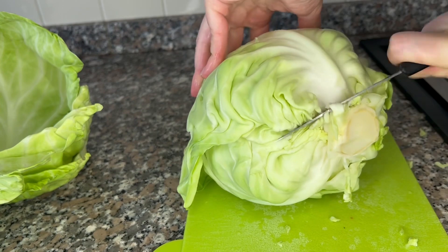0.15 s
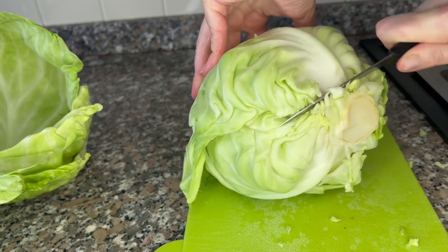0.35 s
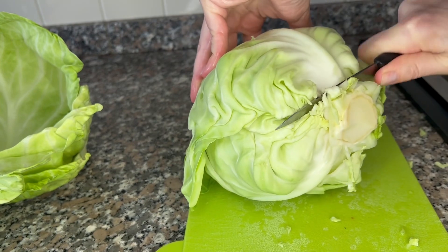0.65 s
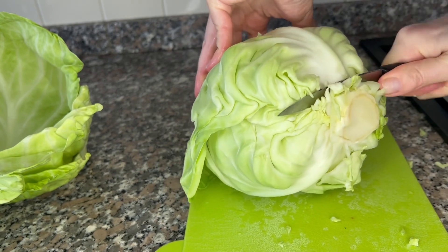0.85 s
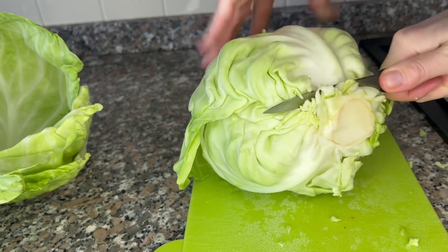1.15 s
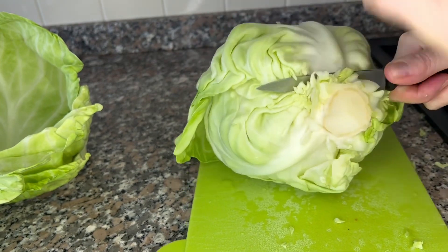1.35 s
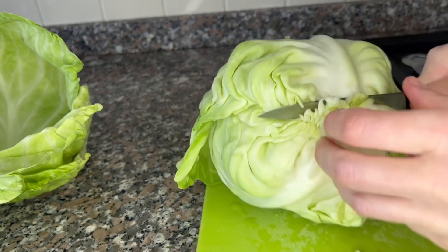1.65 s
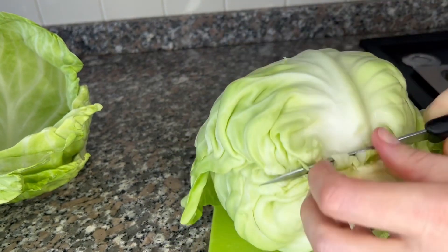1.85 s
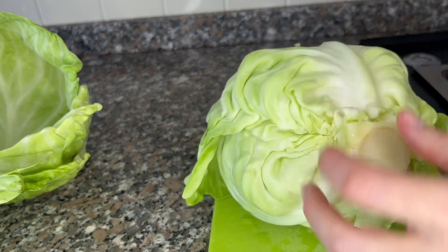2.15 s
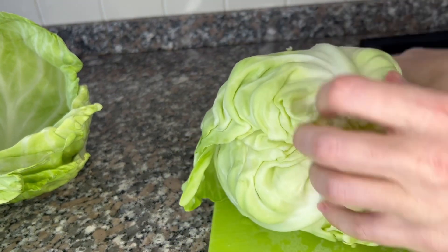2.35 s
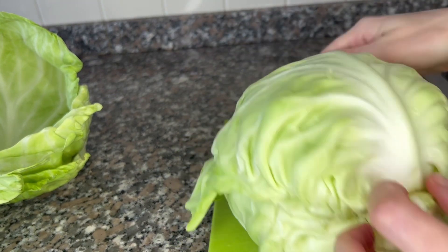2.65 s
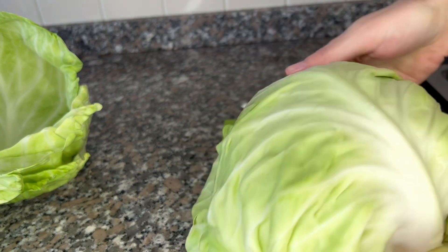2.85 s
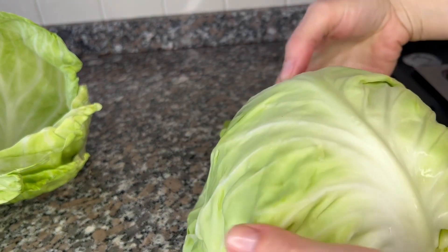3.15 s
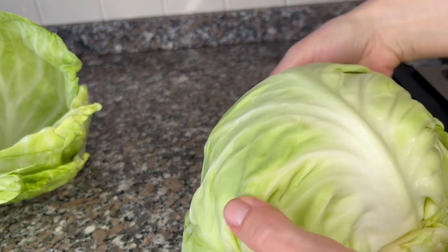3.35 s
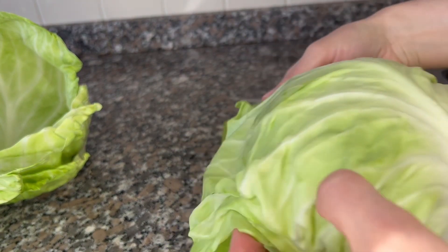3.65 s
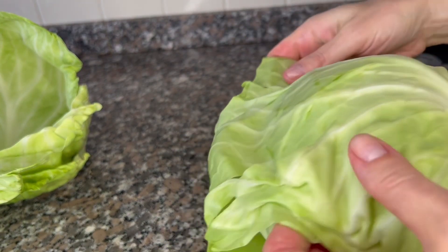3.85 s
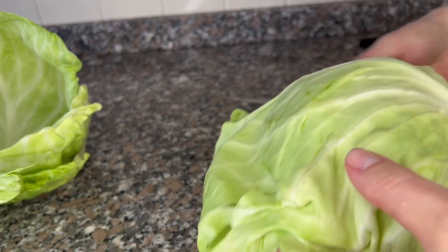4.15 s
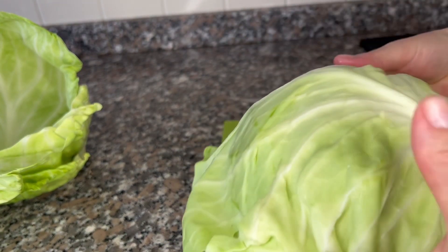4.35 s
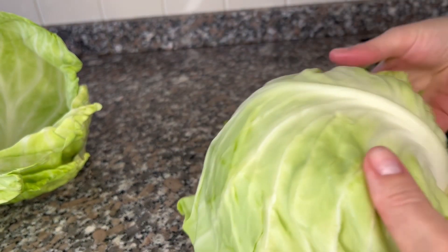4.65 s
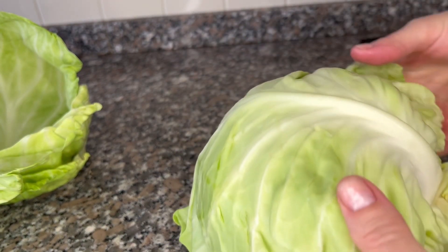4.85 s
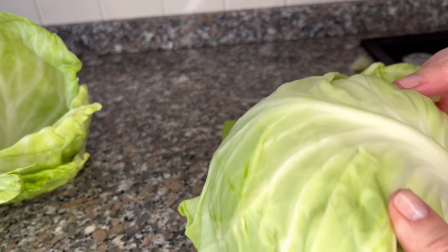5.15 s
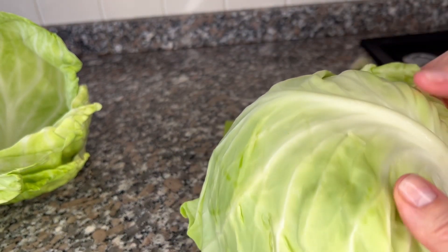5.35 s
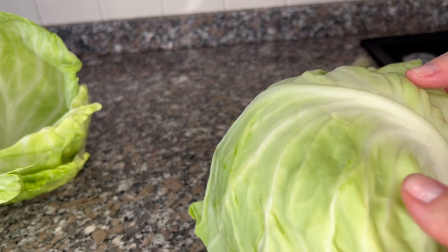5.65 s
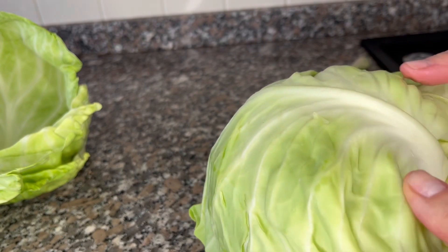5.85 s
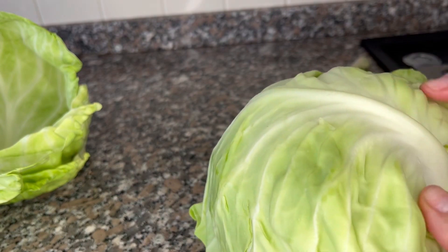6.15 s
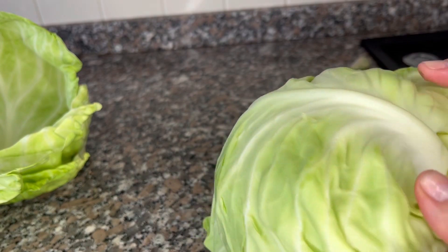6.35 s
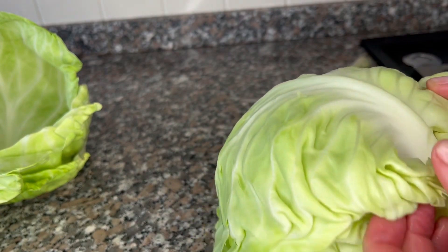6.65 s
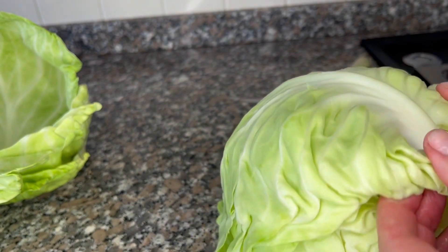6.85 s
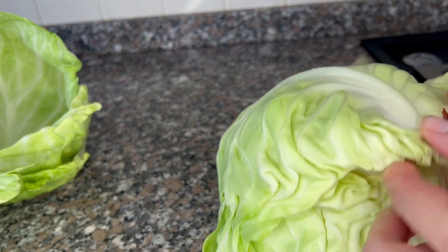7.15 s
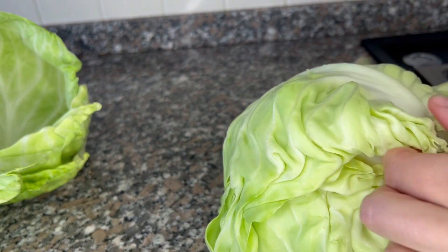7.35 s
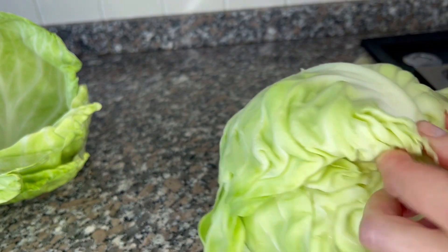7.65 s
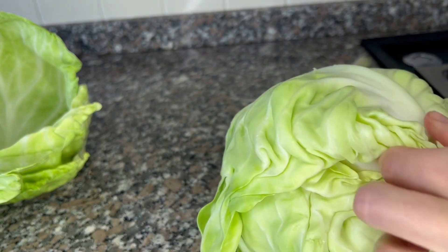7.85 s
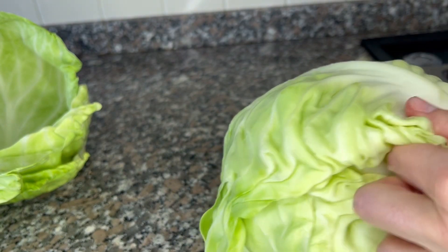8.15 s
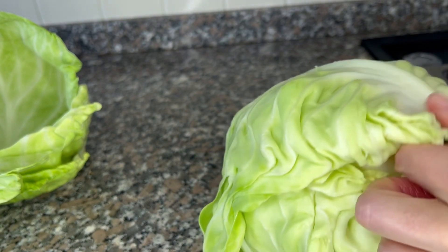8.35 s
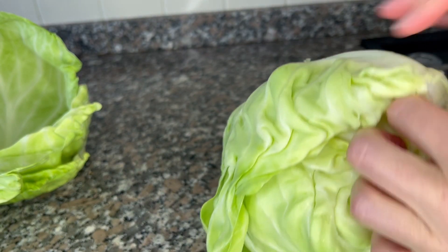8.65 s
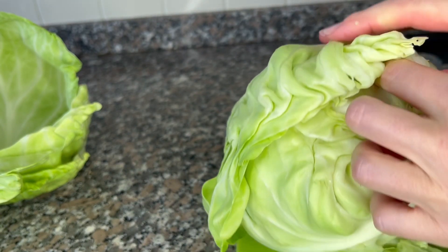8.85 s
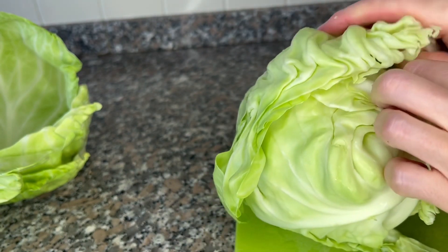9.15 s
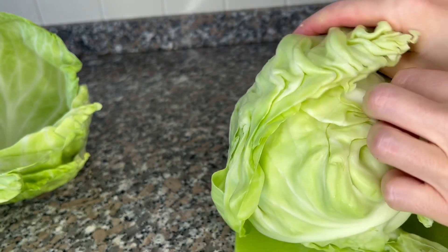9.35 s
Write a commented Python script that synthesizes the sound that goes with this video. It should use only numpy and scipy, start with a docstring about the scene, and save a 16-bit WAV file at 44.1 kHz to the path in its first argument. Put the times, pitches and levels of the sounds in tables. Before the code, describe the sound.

Crisp cutting at a cabbage stalk, sharp woody cracks, then close leafy rustles, rips and vein snaps, ending in a strong tearing burst.

```python
"""A raw cabbage is cut at the stalk and peeled by hand on a plastic board in a small kitchen.
Throughout, filtered noise gives still air, low rumble and a faint appliance hum.
First the knife crunches in (bursting cells modulate band noise) and draws out with a soft rub. Then the stalk
cracks off in short ringing bursts. Last, fingers slide over leaves that rip (burst cells), squeak (stick-slip
pulses through a resonance) and snap off (noise bursts), while the head bumps softly (damped, sagging notes)."""
import sys
import numpy as np
from scipy import signal
from scipy.fft import rfft, irfft, next_fast_len
from scipy.io import wavfile
from scipy.ndimage import uniform_filter1d

SR = 44100
rng = np.random.default_rng(int(sys.argv[2]) if len(sys.argv) > 2 else 0)


def int16_out(signal):
    """Quantize to a 16-bit WAV file."""
    q = np.round(np.clip(np.atleast_2d(signal).T, -1, 1) * 32767)
    wavfile.write(sys.argv[1], SR, q.astype(np.int16))


N = 419391

# Levels, body and crispness are relative: each source adds its own trim.
# Appliance hum: (time [s], level [dB])
HUM_LEVEL = [(0, -87), (1.1, -71.5), (2, -85), (2.4, -65.5), (3.4, -63), (3.9, -80.5), (9.5, -75.5)]
# Low rumble: (time [s], level [dB])
RUMBLE_LEVEL = [(0, -75), (2, -85), (4.2, -80), (5.3, -67.5), (6.4, -73), (7.1, -59), (7.8, -76),
                (9.5, -67)]
# Spectrum of still air: (frequency [Hz], relative density [dB per Hz])
AIR_SPECTRUM = [(25, -17), (48, 9), (140, 5), (250, 5.5), (600, 5), (8000, 2.5), (16000, -48)]
# Reverberation of the kitchen: (frequency [Hz], time to fall by 60 dB [s])
KITCHEN_T60 = [(100, 0.36), (500, 0.48), (2000, 0.73), (6000, 0.56), (15000, 0.06)]
# Left-right likeness, limited to 0..1 in use: (frequency [Hz], likeness [ratio])
LIKENESS = [(80, 0.94), (600, 0.77), (4000, 0.7), (6500, 0), (9000, 1.1)]
# Left minus right: (frequency [Hz], level [dB])
BALANCE = [(1400, 1), (2300, -1.5), (4500, 6), (6200, 3.5), (8000, 0)]
# Phase lag of the right microphone port: (frequency [Hz], lag [half turns])
PORT_LAG = [(0, 0), (1700, -.12), (2800, .22), (7400, .17), (8500, 0), (9800, -1), (10600, -1), (11600, -2),
            (12500, -2), (13400, -3), (14200, -3), (15200, -4)]
# The head bumps on the board: (time [s], level [dB], nominal pitch [Hz])
BUMPS = [(2.532, -33, 308), (2.56, -33, 204), (3.13, -35, 294), (3.195, -36, 340), (6.307, -42.5, 154),
         (6.903, -35.5, 440), (7.083, -38.5, 360), (7.623, -35, 400), (7.673, -32, 410), (8.044, -25, 225),
         (8.056, -40, 80.4), (8.062, -26, 282), (8.086, -27.5, 308), (8.168, -39, 245), (9.201, -31.5, 404)]
# Waxy leaves stick and slip: (time [s], length [s], typical slip rate [1/s], resonance [Hz], level [dB])
SQUEAKS = [(4.173, 0.08, 72, 850, -51.5), (4.462, 0.048, 510, 3230, -45), (5.606, 0.046, 390, 1480, -46),
           (6.723, 0.016, 770, 805, -51.5), (6.718, 0.019, 800, 2630, -46.5),
           (7.092, 0.063, 300, 1570, -48.5)]
# Small hollow clicks of blade, stalk and leaf: (time [s], level [dB], ring [Hz])
CLICKS = [(1.494, -40, 4500), (2.519, -25, 1190), (2.625, -36, 2750), (2.66, -30, 2390), (3.543, -37, 690),
          (3.675, -34, 1890), (4.06, -36, 1880), (4.088, -36, 1860), (4.28, -34, 855), (4.33, -34.5, 2530),
          (5.316, -30, 1310), (5.587, -35.5, 1120), (5.81, -33, 1390), (5.943, -33, 1710),
          (6.36, -38, 1780), (6.428, -39.5, 2170), (6.801, -32, 2500), (7.39, -34, 1430),
          (7.587, -40, 1210), (8.741, -38, 1550), (9.077, -37, 1710)]
# Steady hold of the hands on the head: (time [s], level [dB], body [dB], crispness [dB])
GRIP = [(0, -67, 13.5, 15), (.42, -76, 7, -9), (.56, -52.5, -1, 13.5), (1.28, -58, -24, -0.5),
        (1.47, -76.5, -24, -6.5), (2.33, -65.5, -6, -5), (2.58, -47.5, 18.5, -2.5), (3.02, -68.5, -39, -9),
        (3.3, -57, 5, -2), (4.08, -54.5, -26, 1), (4.3, -51, -13.5, -9), (4.75, -52.5, -4.5, 0),
        (5.9, -53.5, -4, -3.5), (6.07, -64.5, -4.5, -3), (7.1, -51, -5.5, 2), (7.98, -61, -12.5, -1),
        (9.1, -54.5, 0, -1), (9.51, -37.5, -3, -1.5)]
# Soft rubs: the knife draws out, later fingers slide over leaves: (time [s], length [s], level [dB])
SOFT_RUBS = [(1.114, 0.31, -61.5), (1.69, 0.26, -59), (2.198, 0.19, -58.5), (2.694, 0.26, -54),
             (4.143, 0.41, -56), (4.649, 0.12, -49.5), (4.819, 0.036, -45.5), (4.866, 0.065, -48),
             (5.035, 0.065, -45), (5.095, .055, -52.5), (5.641, 0.11, -45.5), (5.798, 0.094, -44.5),
             (5.885, 0.16, -52.5), (6.112, 0.35, -54.5), (7.668, 0.24, -50.5), (8.865, 0.11, -49)]
# A leaf rips away from the head: (time [s], length [s], level [dB], body [dB], crispness [dB])
RIPS = [(2.91, 0.028, -46, -14.5, -10), (3.09, 0.13, -42, -11, -36), (3.16, 0.066, -38.5, 2, 12.5),
        (3.298, 0.046, -43.5, 0, -6), (3.462, 0.05, -47.5, -6.5, -6.5), (3.617, 0.094, -45.5, -5.5, -4.5),
        (3.945, 0.04, -50.5, -31, -2), (4.352, 0.052, -43, -12, -1), (4.45, 0.06, -44.5, -2, 8.5),
        (4.597, 0.034, -48, -5.5, -2), (5.347, 0.066, -44.5, -12, -5.5), (5.419, 0.036, -41, -7, -11),
        (5.705, 0.072, -43.5, -6, 14), (6.52, 0.025, -43, -10, 0), (6.657, 0.022, -46, -0.5, 5),
        (6.87, 0.027, -46, 3, 6), (7.007, 0.034, -45, 1, -7.5), (7.148, 0.015, -45, 2, -29),
        (7.276, 0.0224, -49.5, -6, -7), (7.606, 0.035, -44.5, -12, -7.5), (8.034, 0.032, -32, -17, -1.5),
        (8.08, 0.099, -48, -10, -5), (8.318, 0.12, -55, 3, -0.5), (8.953, 0.034, -45, -6, -5),
        (8.98, 0.12, -62, 29, -10), (9.172, 0.045, -40.5, -2.5, -11.5), (9.269, 0.1, -41, -11.5, -8),
        (9.426, 0.15, -31.5, -4, -12), (9.47, 0.14, -26.5, 4, -3.5)]
# The blade crunches through: (time [s], length [s], level [dB])
CUTS = [(0.134, 0.053, -55), (0.34, 0.019, -53.5), (0.475, 0.043, -50), (0.591, 0.12, -40.5),
        (0.732, 0.044, -49), (0.821, 0.018, -41.5), (1.078, 0.054, -43), (1.172, 0.1, -63),
        (1.886, 0.05, -53)]
# Leaf veins snap: (time [s], level [dB], ring [Hz], crispness [dB])
SNAPS = [(0.1, -41, 950, -13.5), (0.495, -35, 1320, -3), (0.63, -32.5, 3430, -24), (0.664, -27.5, 3250, -5),
         (0.825, -24.5, 2700, -7), (0.837, -28.5, 2820, -30), (0.889, -27.5, 2580, -14),
         (0.905, -23, 3330, -16), (0.946, -28, 4400, 6), (1.797, -33, 6950, 12), (2.242, -38.5, 2560, -17),
         (3.168, -20.5, 1380, -13.5), (3.706, -33, 1930, -31), (3.999, -34.5, 4950, 8),
         (4.032, -26, 1700, -6), (4.252, -27.5, 900, -36), (4.414, -30.5, 1820, -9.5),
         (4.609, -30.5, 843, -25), (5.045, -33, 1000, -2), (5.281, -27, 1550, -13),
         (5.287, -22.5, 2430, -19), (5.297, -26, 2150, -17), (5.344, -26.5, 2640, -16),
         (5.367, -27, 2770, -16), (5.432, -27, 750, -29), (5.673, -33, 1590, -2), (5.836, -31.5, 1920, -12),
         (5.865, -28, 2450, 5), (6.303, -27, 2960, -14), (6.491, -28, 1660, -15), (6.53, -24.5, 1870, -6.5),
         (6.554, -29, 1540, -13), (6.64, -31.5, 1430, -12), (6.792, -31.5, 2480, -4),
         (6.84, -28, 2030, -23), (6.846, -25.5, 1910, -14.5), (6.899, -29.5, 1700, -6),
         (7.082, -27.5, 725, -20), (7.173, -30, 1780, -12), (7.183, -29, 1110, -15),
         (7.295, -31.5, 1700, -14), (7.521, -26.5, 1680, -9), (7.797, -22.5, 1870, -13.5),
         (8.04, -15.5, 1520, -16), (8.321, -36, 1270, -16), (8.931, -21.5, 1410, -17.5),
         (9.147, -29, 2450, -23), (9.263, -33, 2190, -17), (9.457, -15, 1620, -22),
         (9.471, -14.5, 1220, -25), (9.498, -12.5, 870, -23)]
# The stalk breaks: (time [s], level [dB], ring [Hz], crispness [dB])
CRACKS = [(2.397, -3.5, 1080, -4), (2.524, -4, 960, -27), (2.554, -20.5, 1040, -37),
          (2.584, -19.5, 1130, -45), (2.613, -24, 890, -25), (2.667, -23.5, 2380, -11),
          (2.681, -28, 2430, -13), (2.787, -18.5, 2380, -16), (2.927, -22.5, 2190, -17.5),
          (3.072, -16, 1080, -15.5), (3.091, -21, 1160, -42), (3.1, -18, 1090, -78), (3.134, -8, 1180, -39),
          (3.152, -19, 1500, -6)]
# Spectra of leaf, vein and stalk: (frequency [Hz], relative density [dB per Hz])
LEAF_SPECTRUM = [(70, -9.5), (450, -3.5), (750, -1.5), (2200, -4), (4000, -9), (6500, -12), (11500, -12),
                 (13000, 1.5), (16000, -39.5)]
VEIN_SPECTRUM = [(80, -71), (300, -5), (1000, -1.5), (4000, -3), (11000, -1), (15000, -8.5)]
STALK_SPECTRUM = [(80, -8.5), (300, 5), (1000, 2.5), (1900, 8), (3200, 2), (8000, -12), (11000, -53),
                  (15000, -36)]

HUM_HZ, AIR_DB, CUTOFF_HZ = 135.8, -70, 16000
CLICKS_PER_S, PEEL_FROM_S = 15, 3.3   # stray clicks
CELL_S = .0008   # base decay time of a burst cell
SHIVER_DB, SHIVER_S = -17, .008   # a snapped piece shivers a little longer
CLUMP_DB = 4.0   # spread of the slow swells in cell size
RUB = .14   # power of the smooth rub against the cells
EDGES = np.geomspace(70, 17000, 19)   # band edges [Hz]
CENTRES = np.sqrt(EDGES[1:] * EDGES[:-1])
TIME = np.arange(N) / SR
STEP = 64   # samples per step of the slow controls
SLOW_TIME = TIME[::STEP]


def from_db(db):
    """Logarithmic level: decibels to amplitude gain."""
    return 10 ** (np.asarray(db) / 20)


def rms_one(x):
    """Normalisation of effective value: scale to rms 1."""
    return x / np.sqrt(np.mean(x ** 2) + 1e-20)


def in_time(rows):
    """Linear interpolation: each column of a curve at every sample."""
    s, *columns = np.transpose(rows)
    return [np.interp(TIME, s, column) for column in columns]


def at_hz(points, hz):
    """Logarithmic pitch: interpolate a table on a log-frequency axis."""
    f, value = np.transpose(points)
    return np.interp(np.log(hz), np.log(f), value)


def band(x, low, high):
    """Causal band-pass filtering between two frequencies."""
    sos = signal.butter(2, [low, high], "band", fs=SR, output="sos")
    return signal.sosfilt(sos, x + 1e-18)


def drift(rate):
    """Slow random fluctuation: straight lines between unit-normal knots, rate of them per second."""
    knots = rng.standard_normal(int(N / SR * 400) + 2)
    return np.interp(TIME * rate, np.arange(len(knots)), knots)


def add(track, s, sound):
    """Superposition: mix a sound into a track at time s."""
    i = int(np.clip(round(s * SR), 0, N - 1))
    track[..., i:i + sound.shape[-1]] += sound[..., :N - i]


def spread(mid, side, hz):
    """Coherence: left and right from two unrelated sounds, as alike as the ports hear this pitch."""
    alike = np.clip(at_hz(LIKENESS, hz), 0, 1)
    common = np.sqrt((1 + alike) / 2) * mid
    opposed = np.sqrt((1 - alike) / 2) * side
    return np.stack([common + opposed, common - opposed])


def band_gains(spectrum):
    """Spectral density times bandwidth: each band's rms share."""
    gains = from_db(at_hz(spectrum, CENTRES)) * np.sqrt(np.diff(EDGES))
    return gains / np.linalg.norm(gains)


def blend(hz, body, crisp):
    """Spectral tilt: dB at one pitch, from body (low) and crispness (high) against the middle range."""
    corners = np.log([330, 1400, 6000])   # body, middle, crisp [Hz]
    body_weight = np.interp(np.log(hz), corners, [1, 0, 0])
    crisp_weight = np.interp(np.log(hz), corners, [0, 0, 1])
    return body_weight * body + crisp_weight * crisp


def leaf_colour(body_db, crisp_db):
    """Spectral shaping at constant power: band shares of a leaf with this body and crispness."""
    tilt = from_db([blend(hz, np.atleast_1d(body_db), crisp_db) for hz in CENTRES])
    gains = band_gains(LEAF_SPECTRUM)[:, None] * tilt
    return gains / np.linalg.norm(gains, axis=0)


def stroke(s, length, rise_s, release_s, fade_db):
    """Attack and release: a stroke catches, fades (or builds, if negative) and runs out."""
    age = np.maximum(SLOW_TIME - s, 0)
    gate = np.minimum(age / rise_s, 1) * np.exp(-np.maximum(age - length, 0) / release_s)
    return gate * from_db(-fade_db * (np.minimum(age / length, 1) - 1.0))


def still_air():
    """Broadband noise: a random spectrum shaped by frequency, partly alike at left and right."""
    size = next_fast_len(N)
    hz = np.fft.rfftfreq(size, 1 / SR) + 1
    noise = rfft(rng.standard_normal((2, size)))
    air = irfft(spread(*noise, hz) * from_db(at_hz(AIR_SPECTRUM, hz)), size)[:, :N]
    return from_db(AIR_DB) * rms_one(air)


def appliance_hum(level_db=0.5, half_width_hz=5.1, waver_db=3.0):
    """Narrow-band noise: a hum whose strength wavers at random."""
    noise = rng.standard_normal(N + SR)   # a second extra lets the filter settle
    tone = band(noise, HUM_HZ - half_width_hz, HUM_HZ + half_width_hz)[SR:]
    hum = rms_one(tone * from_db(waver_db * drift(9)))
    return from_db(in_time(HUM_LEVEL)[0] + level_db) * hum


def low_rumble(level_db=1.5):
    """Band-limited noise: a low rumble that follows a level curve."""
    rumble = rms_one(band(rng.standard_normal(N + SR), 40.4, 69.0)[SR:])
    return from_db(in_time(RUMBLE_LEVEL)[0] + level_db) * rumble


def kitchen(x, wet_db=-13, early_db=-15, early_s=0.051, gap_s=0.0028, size=32768):
    """Reverberation: dense early reflections from worktop and tiles, then a tail that dies band by band."""
    t, white = np.arange(size) / SR, rng.standard_normal((2, 2, size))
    response = 0
    for k, hz in enumerate(CENTRES):
        tail = from_db(-60 * t / at_hz(KITCHEN_T60, hz))
        early = np.exp(-t / early_s)
        tail = from_db(wet_db) * tail / np.linalg.norm(tail)
        early = from_db(early_db) * early / np.linalg.norm(early)
        envelope = np.hypot(tail, early) * (t > gap_s)
        # the middle range arrives unrelated at left and right
        walls = white[k % 2] if 1000 < hz < 8000 else spread(*white[k % 2], hz)
        response = response + band(walls * envelope, EDGES[k], EDGES[k + 1])
    return signal.fftconvolve(x, response, axes=1)[:, :N]


def worktop(x, bounce=.3, lag_s=.001, sway=.5):
    """Comb filtering: the stone throws the sound back; the delay shifts as the head is turned."""
    late = TIME - lag_s * np.exp(sway * drift(4.5))
    reflection = np.array([np.interp(late, TIME, side) for side in x])
    return (x + bounce * reflection) / np.hypot(1, bounce)


def bumps(cycles=1.83, sag=0.66, width=2.9, knock=0.64, size=4096):
    """Damped oscillation: a dull note sags in pitch as the weight settles, with a knock around it."""
    out, t = np.zeros(N), np.arange(size) / SR
    for s, db, hz in BUMPS:
        age = t * hz / cycles
        pitch = hz * (1 + sag * (np.exp(-age) - .5))
        note = np.sin(2 * np.pi * np.cumsum(pitch) / SR)
        thud = rms_one(band(rng.standard_normal(size), hz / width, hz * width))
        sound = (note + knock * thud) * np.sqrt(age) * np.exp(-age)
        add(out, s, from_db(db) * sound / np.abs(sound).max())
    return out


def squeaks(jitter=0.13, width_hz=250, uneven_db=4, scratch=0.048, count=64):
    """Stick-slip friction: uneven slips ring the leaf; slow creaks stumble more than fast squeaks."""
    out = np.zeros(N)
    for s, length, per_s, hz, db in SQUEAKS:
        slips = np.zeros(int(length * SR))
        stumble = min(jitter * 400 / per_s, .6)
        gaps = np.exp(stumble * rng.standard_normal(count)) / per_s
        at = (np.cumsum(gaps) * SR).astype(int)
        at = at[at < len(slips)]
        slips[at] = from_db(uneven_db * rng.standard_normal(count))[:len(at)]
        r = np.exp(-np.pi * width_hz / SR)   # pole radius of the resonance
        ring = signal.lfilter([1, -1], [1, -2 * r * np.cos(2 * np.pi * hz / SR), r * r], slips)
        sound = (rms_one(ring) + scratch * rms_one(slips)) * signal.windows.tukey(len(slips))
        add(out, s, from_db(db) * rms_one(sound))
    return out


def hollow_clicks(loudness, stray_db=1.5, vary_db=4.5, low_hz=800, high_hz=3600, width=1.45, tick=0.22,
                  size=512):
    """Impulsive resonance: small hollow clicks; stray ones follow the hands' effort while they peel."""
    at = np.flatnonzero((rng.random(N) < CLICKS_PER_S / SR) & (TIME > PEEL_FROM_S))
    strength, pitch = rng.random((len(at), 2)).T
    effort_db = 20 * np.log10(np.minimum(loudness[at], 2 * np.median(loudness)))
    level_db = effort_db + stray_db - vary_db * np.log(strength / 2 + 0.057)
    strays = zip(at / SR, level_db, low_hz * (high_hz / low_hz) ** pitch)
    out, t = np.zeros(N), np.arange(size) / SR
    for s, db, hz in [*CLICKS, *strays]:
        burst = rng.standard_normal(size) * np.exp(-t / CELL_S)
        ring = band(burst, hz / width, hz * width)
        add(out, s, from_db(db) * (ring / np.abs(ring).max() + tick * burst))
    return out


def grip_and_rubs(body_db=5.5, crisp_db=3.5):
    """Sliding friction: band power of the hands' steady hold, with a smooth swell for each soft rub."""
    db, body, crisp = [column[::STEP] for column in in_time(GRIP)]
    power = from_db(db) ** 2
    for s, length, level in SOFT_RUBS:
        swell = np.sin(np.pi * np.clip((SLOW_TIME - s) / length, 0, 1))
        power = power + (from_db(level) * swell) ** 2
    return power * leaf_colour(body + body_db, crisp + crisp_db) ** 2


def rips(body_db=6.0, crisp_db=5.0):
    """Tearing fracture: band power of the rips; thick ribs sound full, thin edges crisp."""
    power = 0
    for s, length, db, body, crisp in RIPS:
        pull = from_db(db) * stroke(s, length, rise_s=0.0061, release_s=0.013, fade_db=1.5)
        power = power + (pull * leaf_colour(body + body_db, crisp + crisp_db)) ** 2
    return power


def knife(body_db=-6.0, crisp_db=10.0, hollow_hz=600, hollow_db=8):
    """Cutting fracture: band power, bright over the head's hollow note, building as the blade sinks in."""
    power = 0
    for s, length, db in CUTS:
        push = from_db(db) * stroke(s, length, rise_s=0.0052, release_s=0.031, fade_db=-1.5)
        power = power + push ** 2
    octaves = np.log2(CENTRES[:, None] / hollow_hz)
    hollow = from_db(hollow_db * np.exp(-(2 * octaves) ** 2))
    return power * (hollow * leaf_colour(body_db, crisp_db)) ** 2


def effort():
    """Addition of powers: loudness of grip, rubs, knife and rips together, and each band's rms share."""
    power = grip_and_rubs() + knife() + rips()
    total = power.sum(axis=0)
    return np.interp(TIME, SLOW_TIME, np.sqrt(total)), np.sqrt(power / total)


def rustle(loudness, colours, per_s=520, crowding=.8, size_db=1.5, colour_db=3.5, patchy_db=3.5,
           ring_cycles=1.0, even_s=0.078):
    """Random impulse process: cells burst more often the harder the pull, in clumps, over a smooth rub."""
    sizes = from_db(size_db * np.minimum(rng.exponential(1, N), 5) + CLUMP_DB * drift(70))
    rate = per_s * (loudness / np.median(loudness)) ** crowding
    born = np.flatnonzero(rng.random(N) < rate / SR)
    white, tint = rng.standard_normal((2, 2, N)), rng.standard_normal(N)
    out = np.zeros((2, N))
    for k, hz in enumerate(CENTRES):
        energy = np.zeros(N)
        energy[born] = (sizes[born] * from_db(colour_db * tint[born - k])) ** 2   # each cell its own colour
        keep = np.exp(-2 / (SR * (CELL_S + ring_cycles / hz)))   # low notes ring longer
        energy = signal.lfilter([1 - keep], [1, -keep], energy + 1e-12)
        # dividing by the local mean lets the hand set the loudness
        energy = energy / (np.abs(uniform_filter1d(energy, int(even_s * SR) + 1)) + 1e-12)
        patches = from_db(patchy_db * drift(22))   # resonances shift as the leaf bends
        grain = np.sqrt((energy + RUB) / (1 + RUB))
        envelope = grain * loudness * patches * np.repeat(colours[k], STEP)[:N]
        unit = np.sqrt(SR / 2 / (EDGES[k + 1] - EDGES[k]))   # brings band noise to about rms 1
        out += unit * band(spread(*white[k % 2], hz) * envelope, EDGES[k], EDGES[k + 1])
    return out


def breaks(table, spectrum, level_db, crisp_db, tear_s, ring_cycles, ring_db, octaves=0.37, size=4096):
    """Brittle fracture: a brief noise burst, stressed at the freed piece's pitch, with a short shiver."""
    s, db, ring_hz, crisp = np.transpose(table)
    t, white = np.arange(size) / SR, rng.standard_normal((len(s), 2, 2, size))
    ring = ring_db * np.exp(-(np.log2(CENTRES[:, None] / ring_hz) / octaves) ** 2)
    tilt = [blend(hz, 0, crisp + crisp_db) for hz in CENTRES]
    colours = band_gains(spectrum)[:, None] * from_db(ring + tilt)
    colours = colours / np.linalg.norm(colours, axis=0) * from_db(db + level_db)
    sounds, out = 0, np.zeros((2, N))
    for k, hz in enumerate(CENTRES):
        envelope = np.exp(-t / (tear_s + ring_cycles / hz)) + from_db(SHIVER_DB) * np.exp(-t / SHIVER_S)
        noise = spread(white[:, k % 2, 0], white[:, k % 2, 1], hz)
        burst = band(noise * envelope, EDGES[k], EDGES[k + 1])
        strength = np.sqrt(np.sum(burst ** 2, axis=2).mean(axis=0))
        sounds = sounds + burst * (colours[k] / strength)[:, None]
    for i, start in enumerate(s):
        add(out, start, sounds[:, i])
    return out


def scene():
    """Superposition of direct and reverberant sound: the cabbage close by, the kitchen around it."""
    stalk = breaks(CRACKS, STALK_SPECTRUM, level_db=13.5, crisp_db=23.0,
                   tear_s=0.00057, ring_cycles=1.6, ring_db=9)
    veins = breaks(SNAPS, VEIN_SPECTRUM, level_db=16.0, crisp_db=9.5,
                   tear_s=0.0013, ring_cycles=0.24, ring_db=10.5)
    loudness, colours = effort()
    close_by = rustle(loudness, colours) + veins + hollow_clicks(loudness)
    cabbage = worktop(close_by) + stalk + bumps() + squeaks()
    background = still_air() + appliance_hum() + low_rumble()
    return cabbage + kitchen(cabbage) + background


def record(dry):
    """Linear filtering: two microphone ports differ in colour and phase; the top is cut."""
    size = next_fast_len(N + SR // 10, True)
    hz = np.fft.rfftfreq(size, 1 / SR) + 1
    half_each = np.array([[.5], [-.5]])   # left gains what right loses
    ports = rfft(dry, size) * from_db(at_hz(BALANCE, hz) * half_each)
    ports[1] *= np.exp(-1j * np.pi * np.interp(hz, *np.transpose(PORT_LAG)))
    low_pass = signal.ellip(12, .2, 110, CUTOFF_HZ, fs=SR, output="sos")
    return signal.sosfilt(low_pass, irfft(ports, size)[:, :N])


dry = scene()
out = record(dry)
int16_out(out)
```